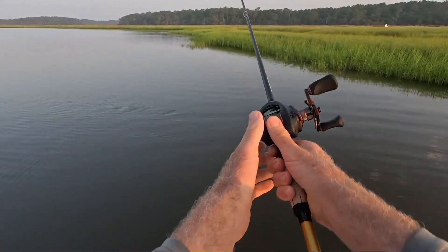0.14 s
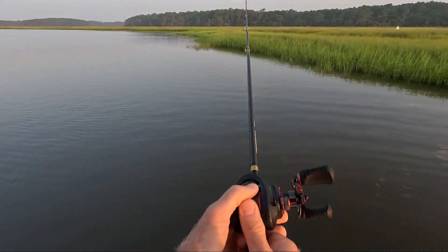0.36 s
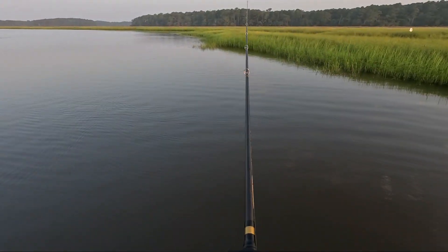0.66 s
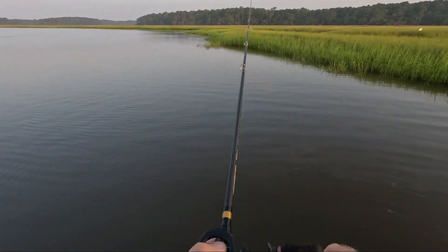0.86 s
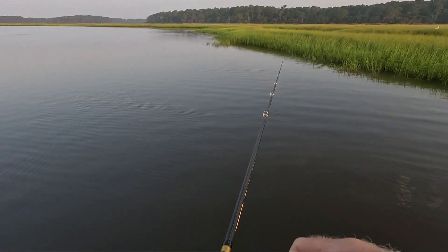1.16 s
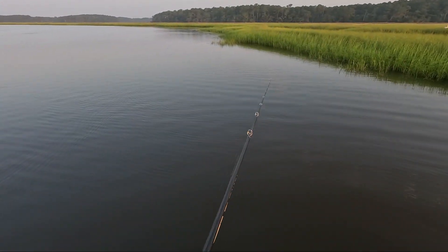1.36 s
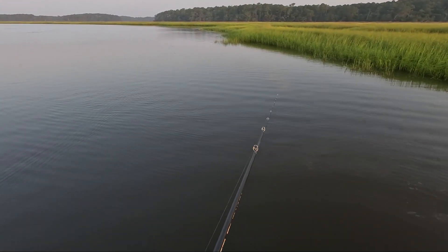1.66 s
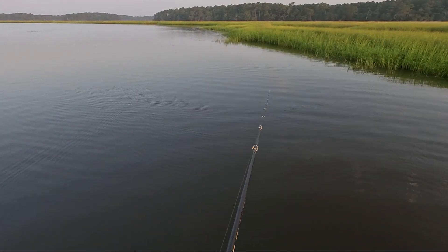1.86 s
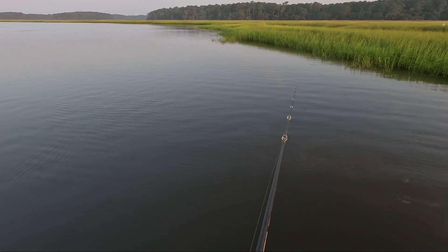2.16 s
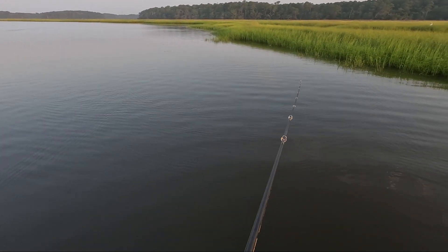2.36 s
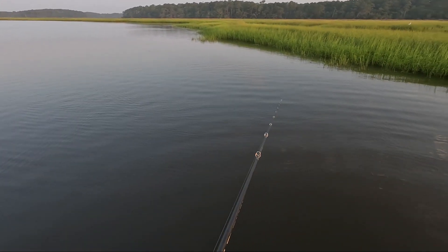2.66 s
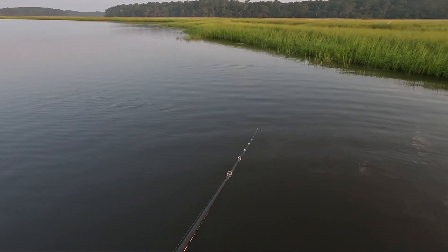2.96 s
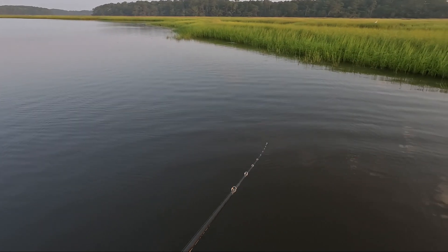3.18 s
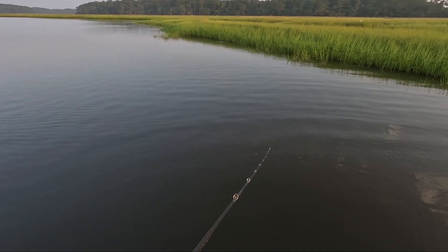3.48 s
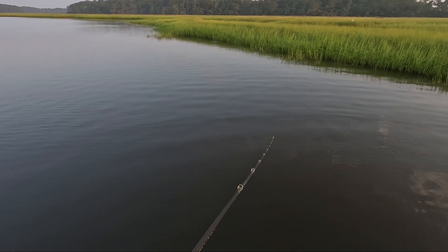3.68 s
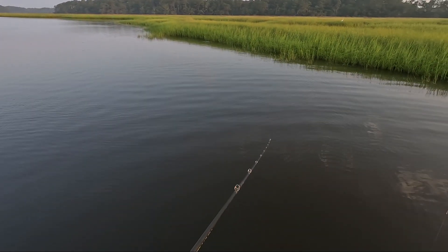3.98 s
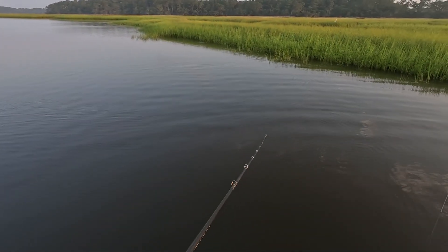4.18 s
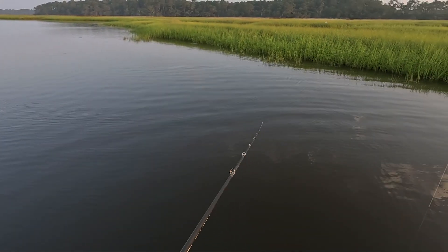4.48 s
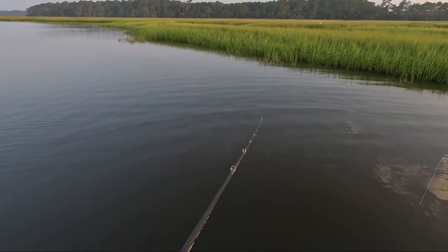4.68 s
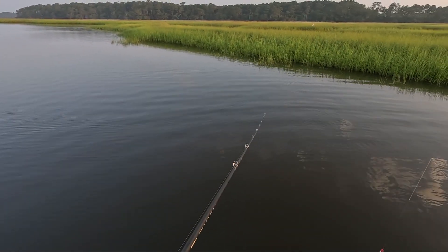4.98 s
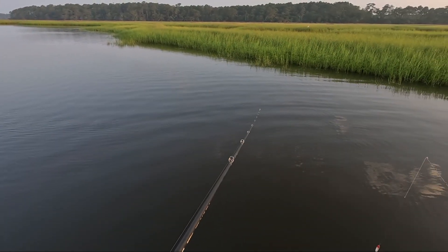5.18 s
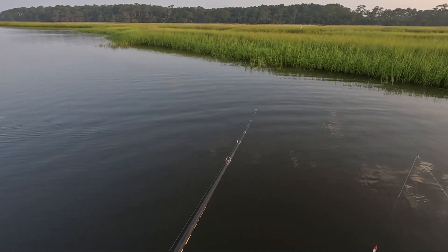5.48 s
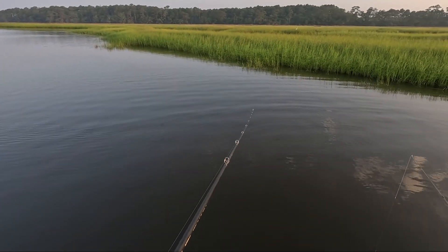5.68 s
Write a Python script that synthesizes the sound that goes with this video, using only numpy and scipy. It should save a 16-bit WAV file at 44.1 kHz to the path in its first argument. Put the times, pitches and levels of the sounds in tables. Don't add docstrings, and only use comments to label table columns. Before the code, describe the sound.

Close, chest-height sound on a small boat in a quiet marsh. Low wind thumps and sleeve rustle open it with small ticks; a sharp, loud reel clutch snap lands at about one second. Winding ticks, thin squeaks and dull hull knocks follow, then it grows still, leaving faint hush and distant bird whistles.

```python
import sys
import numpy as np
from scipy import signal
from scipy.fft import rfft, irfft
from scipy.io import wavfile
from scipy.ndimage import uniform_filter1d

SR = 44100
rng = np.random.default_rng(int(sys.argv[2]) if len(sys.argv) > 2 else 0)


def int16_out(signal):
    q = np.round(np.clip(np.atleast_2d(signal).T, -1, 1) * 32767)
    wavfile.write(sys.argv[1], SR, q.astype(np.int16))


def linear_from_db(decibels):
    return 10 ** (np.asarray(decibels, float) / 20)


N = 257594


def noise(colour):
    hz, db = np.transpose(colour)
    f = np.maximum(np.arange(N // 2 + 1) * SR / N, 1)
    gain = linear_from_db(np.interp(np.log(f), np.log(hz), db, left=-90, right=-90))
    x = irfft(rfft(rng.standard_normal(N)) * gain, N)
    return x / x.std()


def walk(rate_hz):
    k = int(SR / rate_hz)
    held = np.repeat(rng.standard_normal(N // k + 1), k)
    return 1.1 * uniform_filter1d(uniform_filter1d(held, k), k)[:N]


def curve(table):
    return np.interp(np.arange(N) / SR, *np.transpose(table))


def swells(base_db, rows):
    t = np.arange(N) / SR
    power = linear_from_db(base_db) ** 2
    for s, half_s, db in rows:
        power = power + linear_from_db(db) ** 2 * np.exp(-((t - s) / half_s) ** 2)
    return np.sqrt(power)


def ring(hz, t60_s, phase=0.):
    t = np.arange(int(t60_s * SR)) / SR
    return np.sin(2 * np.pi * hz * t + phase) * np.exp(-np.log(1000) * t / t60_s)


def soft(x, rise_s):
    return x * np.minimum(np.arange(len(x)) / (rise_s * SR), 1)


def add(out, s, x):
    i = int(round(s * SR))
    out[i:i + len(x)] += x[:len(out) - i]


def air():
    # (frequency [Hz], density [dB per Hz])
    sway_colour = [(1.5, -12), (3, 1.5), (8, -1), (14, -2.5), (20, -16)]
    # (frequency [Hz], density [dB per Hz])
    buffet_colour = [(14, -8.5), (20, 0), (30, -1.5), (45, -9.5), (70, -27.5)]
    # (frequency [Hz], density [dB per Hz])
    rumble_colour = [(35, -20), (50, 0.5), (100, -5.5), (160, -18), (300, -26.5)]
    # (time [s], level [dB])
    breeze = [
        (0, -48),
        (1.4, -51.5),
        (1.95, -54),
        (3.1, -45),
        (3.7, -61.5),
        (4.3, -62.5),
        (5.84, -59),
    ]
    # (time [s], half length [s], level [dB])
    gusts = [(0, 0.038, -49), (0.218, 0.026, -39), (0.501, 0.046, -34.5), (0.687, .025, -35.5),
             (.82, .025, -49), (1.073, 0.052, -42), (1.33, .07, -42.5), (1.478, 0.08, -41.5),
             (1.658, 0.03, -44.5), (2.13, 0.12, -44.5), (2.422, 0.11, -58), (2.769, .06, -44.5),
             (2.858, 0.039, -34), (2.988, .04, -41), (3.212, 0.046, -43), (3.501, 0.075, -48),
             (3.871, 0.091, -51.5), (4.7, 0.022, -51), (5.32, 0.058, -62), (5.619, 0.044, -54),
             (5.76, 0.023, -63)]
    # (time [s], half length [s], level [dB])
    bumps = [
        (1.199, 0.055, -53),
        (2.14, 0.022, -38.5),
        (4.68, 0.047, -59),
        (5.332, 0.074, -57.5),
        (5.692, 0.049, -55),
    ]
    wind = swells(curve(breeze), gusts)
    sway_follow = .6
    sway = linear_from_db(-40 + 5 * walk(3.4)) * (wind / linear_from_db(-47.5)) ** sway_follow
    hull = np.hypot(swells(-59.5, bumps), linear_from_db(-14.5) * wind)
    return sway * noise(sway_colour) + wind * noise(buffet_colour) + hull * noise(rumble_colour)


def motor():
    # (centre [Hz], width [Hz], level [dB])
    hum = [
        (190, 10, -69.5),
        (253, 5, -75),
        (125.4, 18, -71.5),
    ]
    out = np.zeros(N)
    for hz, w, db in hum:
        band = [(hz - 3 * w, -40), (hz - w / 2, 0), (hz + w / 2, 0), (hz + 3 * w, -40)]
        out += linear_from_db(db) * noise(band)
    return out


def marsh():
    # (frequency [Hz], density [dB per Hz])
    hush_colour = [(71, -33.5), (120, -3), (204, -11.5), (246, -9.5), (454, -15.5), (513, -16),
                   (988, -23.5), (2110, -27), (2870, -28.5), (14400, -38.5), (16000, -44.5)]
    return linear_from_db(-66.5 + 0.37 * walk(4.6)) * noise(hush_colour)


def cloth():
    # (frequency [Hz], density [dB per Hz])
    rub_colour = [(900, -16), (1400, -1), (1900, -0.5), (2400, -4.5), (3200, -10), (5000, -13),
                  (7000, -22.5)]
    # (frequency [Hz], density [dB per Hz])
    drag_colour = [(250, -18), (450, -2.5), (560, -3.5), (800, -7), (1200, -15.5)]
    # (frequency [Hz], density [dB per Hz])
    swish_colour = [(3500, -14.5), (5000, -0.5), (6500, -1.5), (8000, -2), (10000, -5), (12000, -16)]
    # (time [s], level [dB])
    fidget_curve = [
        (0, -72.5),
        (.9, -80),
        (1.5, -71),
        (2.2, -73),
        (2.75, -79.5),
        (3.3, -73.5),
        (4.0, -80.5),
        (5.84, -78),
    ]
    # (time [s], half length [s], rub level [dB], drag over rub [dB])
    moves = [(0.125, 0.096, -74.5, 10), (0.274, 0.036, -64.5, -4), (0.46, 0.07, -78, 4.5),
             (0.624, 0.049, -62.5, -2.2), (0.762, 0.025, -72.5, 6.5), (1.112, 0.053, -63.5, 7),
             (1.299, 0.098, -66, -8), (1.668, .05, -66.5, -8.5), (1.74, .055, -74, 12),
             (1.909, 0.072, -69.5, 12), (2.105, .05, -72, 7.5), (2.275, 0.05, -67.5, -10),
             (2.354, 0.046, -68.5, 1.5), (2.449, 0.071, -74, -13), (2.598, 0.058, -77.5, 7),
             (3.7, 0.12, -77, -17), (4.2, 0.1, -76.5, 2.5), (4.359, 0.1, -81.5, 11)]
    # (time [s], half length [s], level [dB])
    sweeps = [
        (.04, 0.15, -76),
        (0.208, 0.14, -75),
        (0.632, 0.047, -71.5),
        (0.755, 0.06, -79),
        (2.15, 0.1, -92.5),
        (3.1, .2, -84.5),
    ]
    fold, fidget_db = walk(60), curve(fidget_curve)
    rub = swells(fidget_db, [m[:3] for m in moves])
    drag = swells(fidget_db + 0.94, [(s, half_s, db + weight_db) for s, half_s, db, weight_db in moves])
    swish = swells(fidget_db - 11.5, sweeps)
    out = np.zeros(N)
    for gain, colour in ((rub, rub_colour), (drag, drag_colour), (swish, swish_colour)):
        flicker = linear_from_db(1.6 * fold + 2.2 * walk(25))
        out += gain * flicker * noise(colour)
    return out


def ticks():
    # (time [s], peak [dB], low ring [Hz], high over low [dB], high ring [Hz])
    tick_rows = [(.25, -58, 2000, -3, 4200), (0.3183, -55, 1730, -10, 4600),
                 (0.3782, -41.5, 1910, -22, 2700), (0.4104, -43, 1800, -10, 3100),
                 (0.548, -56, 1240, -5, 4400), (0.7377, -53, 1900, -11, 4600),
                 (0.778, -48.5, 1220, -15, 4600), (.9189, -51.5, 1900, -13, 4200),
                 (1.285, -57, 2500, -8, 5000), (1.348, -45.5, 1950, -16, 2600),
                 (1.3657, -40, 1434, -8, 4200), (1.4234, -39, 1800, -10, 3500),
                 (1.4269, -38.5, 1500, -3, 3900), (1.52, -42.5, 2000, -14, 4000),
                 (1.5833, -41, 1800, -18, 2800), (1.5884, -46, 1490, -8, 4600),
                 (1.641, -54, 2700, -15, 3000), (1.706, -42, 2000, -18, 4300),
                 (1.7626, -42, 1100, -11, 2600), (1.7667, -40, 1800, -10, 4500),
                 (2.1533, -51, 1370, -18, 4200), (2.3244, -43, 1964, -7, 4400),
                 (2.4145, -58, 1420, -6, 2800), (2.8513, -51, 2200, -6, 4300),
                 (2.9111, -39.5, 2100, -12, 4700), (2.9176, -39.5, 1920, -10, 5000),
                 (2.9227, -50, 900, -18, 4200), (3.5355, -55, 900, -10.5, 4200),
                 (4.5381, -58, 1740, -15.5, 4200), (5.6371, -56, 1670, -11, 4200),
                 (5.7972, -60, 1845, -5, 3400)]
    out = np.zeros(N)
    low = noise([(600, -10), (1000, -3.5), (1900, 4.5), (3000, -14), (4500, -15.0)])
    high = noise([(2500, -4), (3500, 13), (5500, -5), (9000, -12), (12000, -26)])
    n = 600
    fade = soft(np.exp(-np.arange(n) / (0.0021 * SR)), 0.00027)
    low_t60_s, high_t60_s, crack_db = 0.013, 0.0032, -1.5 - 4.5
    for s, db, low_hz, high_db, high_hz in tick_rows:
        i = int(s * SR)
        add(out, s, linear_from_db(db - 3.5) * soft(ring(low_hz, low_t60_s), 0.0009))
        add(out, s, linear_from_db(db + high_db + 8.0) * soft(ring(high_hz, high_t60_s), 0.00013))
        crack = fade * low[i:i + n] + linear_from_db(high_db) * fade ** 2 * high[i:i + n]
        add(out, s, linear_from_db(db + crack_db) * crack)
    return out


def whistle(out, rows, sway, quiver, bend, fade_db, swell_db, overtone_db, turn_share=1):
    for s, length_s, start_hz, end_hz, db in rows:
        t = np.arange(int(length_s * SR)) / SR
        i = int(s * SR)
        hz = end_hz + (start_hz - end_hz) * np.abs(1 - t / (length_s * turn_share)) ** bend
        phase = 2 * np.pi * np.cumsum(hz * quiver[i:i + len(t)]) / SR
        swell = swell_db * np.maximum(1 - t / 0.02, 0)
        gain = linear_from_db(db + swell + fade_db * (t / length_s) ** 2)
        edge = np.minimum(np.minimum(t, length_s - t) / 0.004, 1)
        tone = np.sin(phase) + linear_from_db(overtone_db) * np.sin(2 * phase)
        add(out, s, np.sqrt(2) * gain * edge * sway[i:i + len(t)] * tone)


def birds():
    # (time [s], length [s], start [Hz], end [Hz], level [dB])
    far_notes = [(.25, .1, 2800, 3150, -82), (.548, .03, 3850, 3500, -80), (.75, .12, 3040, 3080, -84),
                 (1.72, .04, 3760, 3700, -79), (1.72, .02, 4020, 3980, -79), (2.715, .016, 3480, 3300, -78),
                 (2.70, .05, 2250, 2700, -80), (2.775, .02, 3050, 2950, -80),
                 (3.385, .018, 4200, 4120, -77), (3.40, .025, 3750, 3400, -81),
                 (3.995, .035, 3100, 2450, -82), (4.06, .035, 4300, 2900, -76.5),
                 (4.175, .02, 3300, 3150, -82), (4.31, .022, 3200, 3050, -80),
                 (4.335, .035, 2750, 2300, -81), (4.495, .018, 3150, 3250, -80),
                 (4.638, .045, 3270, 2650, -82), (5.045, .02, 2950, 2900, -82)]
    # (time [s], length [s], start [Hz], end [Hz], level [dB])
    chirps = [
        (0.454, 0.036, 4300, 4200, -74),
        (0.797, 0.041, 3600, 3720, -80),
        (.955, .05, 2000, 2450, -78),
        (3.455, 0.046, 5100, 4700, -78.5),
        (4.132, 0.025, 5550, 4700, -71),
        (4.256, 0.033, 6300, 4670, -73.5),
    ]
    # (time [s], length [s], start [Hz], end [Hz], level [dB])
    slides = [(.632, 0.061, 2660, 3080, -70), (.688, .045, 3090, 3070, -74), (.675, 0.05, 3380, 3560, -79),
              (1.51, .055, 4350, 4130, -74), (1.62, 0.085, 4080, 3900, -76),
              (2.515, .09, 4220, 3900, -77.5), (2.595, 0.062, 3930, 3550, -73.5),
              (2.655, .045, 3570, 3600, -74.5), (3.24, .05, 4130, 3950, -80), (5.0, .11, 4060, 3880, -85),
              (4.718, 0.013, 6000, 5550, -66), (4.722, 0.028, 5690, 5300, -51.5),
              (4.743, 0.017, 5350, 4860, -57), (4.752, .06, 4880, 4700, -68),
              (4.806, .065, 4700, 4460, -69), (4.965, .03, 4220, 4150, -76)]
    # (time [s], length [s], start [Hz], lowest [Hz], level [dB])
    hooks = [
        (.872, 0.102, 5400, 5220, -71),
        (1.238, .052, 3400, 3120, -74),
        (5.257, .105, 5400, 5120, -70.5),
    ]
    # (time [s], length [s], start [Hz], end [Hz], level [dB])
    plunges = [
        (1.335, .152, 5600, 4720, -69.5),
        (4.882, .08, 4420, 4220, -72),
    ]
    # (time [s], length [s], start [Hz], end [Hz], level [dB])
    near_bird = [
        (2.972, .163, 5930, 4770, -70),
        (3.108, .12, 4480, 4140, -77.5),
    ]
    # (delay [s], level [dB])
    bank_echo = [
        (.014, -13),
        (.024, -15),
        (.044, -21),
    ]
    out = np.zeros(N)
    sway = linear_from_db(3.6 * walk(90) + 1.4 * walk(35))
    quiver = 1 + 0.0025 * walk(150)
    pure_db = -32
    whistle(out, far_notes, sway, quiver, 1.2, -3, -3, pure_db)
    whistle(out, chirps, sway, quiver, 2.8, 1.5, -5, pure_db)
    whistle(out, slides, sway, quiver, 1.1, -6.5, -11, pure_db)
    whistle(out, hooks, sway, quiver, 2, -8, -11, pure_db, turn_share=.5)
    whistle(out, plunges, sway, quiver, 1.8, -9.5, -5.5, pure_db)
    whistle(out, near_bird, sway, quiver, 3.9, -9.5, -5.5, overtone_db=-15)
    n, reed_t60_s = SR // 2, .25
    reeds = soft(rng.standard_normal(n) * np.exp(-np.log(1000) * np.arange(n) / (reed_t60_s * SR)), .012)
    wet = linear_from_db(-13) * signal.fftconvolve(out, reeds / np.linalg.norm(reeds))[:N]
    echoes = sum(linear_from_db(db) * np.roll(out, int(lag_s * SR)) for lag_s, db in bank_echo)
    return out + wet + echoes


def snaps():
    # (time [s], peak [dB], ring [Hz])
    snap_rows = [
        (.3174, -48.5, 9900),
        (.7378, -49.5, 7450),
        (1.093, -55.5, 8270),
        (2.9112, -51, 8800),
    ]
    out = np.zeros(N)
    for s, db, hz in snap_rows:
        add(out, s, linear_from_db(db) * soft(ring(hz, .003), .0002))
    return out


def knocks():
    # (time [s], peak [dB], ring [Hz], t60 [s])
    knock_rows = [(0.544, -54, 1000, 0.042), (0.569, -44, 927, 0.072), (1.0666, -26, 410.2, .02),
                  (1.067, -36, 249.9, .03), (1.075, -54, 130.3, .5), (2.105, -52, 596, 0.046),
                  (2.123, -41, 95, 0.11), (2.127, -48, 299, 0.056), (2.511, -46.5, 656, 0.045),
                  (2.611, -38.5, 330, 0.027), (2.613, -46, 210, .03), (2.612, -49, 800, .012),
                  (2.11, -48, 850, .03), (2.13, -46, 199.7, .07), (2.616, -49.5, 520.2, 0.035)]
    out = np.zeros(N)
    for s, db, hz, t60_s in knock_rows:
        add(out, s, linear_from_db(db) * soft(ring(hz, t60_s), .19 * t60_s))
    return out


def squeal():
    mode_hz = (12300, 13480, 14500, 15500)
    # (time [s], length [s], level [dB], upper modes [dB])
    squeal_rows = [
        (.580, .03, -78, -18),
        (1.36, .08, -82, -7),
        (1.573, 0.1, -78, -18),
        (1.66, 0.022, -84, 2.5),
        (2.052, 0.031, -82.5, -17.5),
        (2.115, .04, -79, -20),
        (2.236, 0.045, -75, -3),
        (2.279, .05, -85, -19),
    ]
    out = np.zeros(N)
    modes = [noise([(hz - 260, -30), (hz - 50, 0), (hz + 50, 0), (hz + 260, -30)]) for hz in mode_hz]
    for s, length_s, db, upper_db in squeal_rows:
        i, n = int(s * SR), int(length_s * SR)
        fade = soft(np.linspace(1, .1, n), 0.0032)
        tone = modes[0] + linear_from_db(upper_db) * sum(modes[1:])
        add(out, s, linear_from_db(db) * fade * tone[i:i + n])
    return out


def clutch():
    # (time [s], level [dB], brightness [dB per octave])
    strikes = [
        (1.0502, -45, -4),
        (1.0540, -45, -6),
        (1.0643, -23, -4.5),
        (1.0662, -2, 1.5),
        (1.0684, -21, 4),
        (1.0718, -26, 0.5),
        (1.0745, -30, -4),
        (1.079, -43.5, -6),
        (1.0930, -51, -3),
        (1.0565, -46, -5),
    ]
    # (frequency [Hz], level [dB], t60 [s])
    body = [(565, -20, 0.026), (850, -8.5, .021), (1100, -14, 0.02), (1480, -9, 0.015), (1800, -6.5, .010),
            (2310, -11, .012), (2990, -9.5, 0.011), (3600, -18, .01), (4250, -6, 0.0085), (4610, -5, .008),
            (5500, -15, 0.0042), (5760, -9.5, 0.0088), (6250, -10, .006), (6913, -7, 0.0085),
            (7650, -8.5, .006), (8221, -15, .008), (9320, -3.5, 0.0063), (9747, -3.5, 0.0035),
            (10420, -16, .008), (10760, -21, 0.01), (11700, -22, 0.0065), (13500, -23, 0.0055),
            (14500, -25.5, .004), (16400, -23.5, .004)]
    out, t = np.zeros(N), np.arange(N) / SR
    phases = np.pi * np.arange(len(body)) + 0.71 * rng.standard_normal((len(strikes), len(body)))
    for (s, db, tilt_db), row in zip(strikes, phases):
        for (hz, mode_db, t60_s), phase in zip(body, row):
            x = ring(hz, t60_s, phase)
            rise_s = 0.00035 * (4000 / hz) ** .4
            swell = (1 - np.exp(-np.arange(len(x)) / (rise_s * SR))) ** 2
            add(out, s, linear_from_db(db + mode_db + tilt_db * np.log2(hz / 3000)) * swell * x)
    since_s = np.maximum(t - strikes[3][0], 0)
    tail = linear_from_db(-36) * np.exp(-since_s / .006) + linear_from_db(-36 - 11.5) * np.exp(-since_s / 0.033)
    tail = (since_s > 0) * tail
    hiss = noise([(350, -14.5), (600, -1), (1200, -1), (2500, -4.0), (5000, -16), (10000, -22.0), (14000, -33)])
    rattle_s, rattle_len_s = 1.147, .011
    rattle = linear_from_db(-67 + 3 * walk(220)) * np.exp(-.5 * ((t - rattle_s) / rattle_len_s) ** 2)
    rattle_noise = noise([(2500, -3), (3500, -5.5), (5000, -13.5), (6500, -1.0), (8000, -6.5), (9400, -4.5),
                          (12500, -11.5)])
    return out + tail * hiss + rattle * rattle_noise


def scene():
    near, far = ticks() + snaps() + knocks() + clutch(), birds()
    mid = air() + motor() + marsh() + cloth() + near + squeal() + far
    hiss_colour = [(200, -6), (700, -3.0), (1500, -4.5), (5000, -3), (10000, -2.5), (13000, -5.5)]
    hiss = linear_from_db(-87.5 + 1.5 * walk(20)) * noise(hiss_colour)
    band_pass = signal.butter(2, (5200, 7500), "bandpass", fs=SR, output="sos")
    band = linear_from_db(6) * signal.sosfilt(band_pass, near)
    slope = linear_from_db(-12) * np.gradient(np.roll(near + far, 7))
    late = linear_from_db(-9) * np.roll(near, 3)
    dull = linear_from_db(-9) * signal.lfilter([.05], [1, -.95], near)
    side = linear_from_db(-27) * (slope + late + dull + band) + hiss
    return np.array([mid + side, mid - side])


def top_cut(x):
    return signal.sosfilt(signal.butter(12, 16740, fs=SR, output="sos"), x)


def record(dry):
    low_pass = signal.ellip(8, .2, 70, 16300, fs=SR, output="sos")
    cut = signal.sosfilt(low_pass, np.clip(dry, -1, 1))
    return top_cut(cut)


dry = scene()
out = record(dry)
int16_out(out)
```